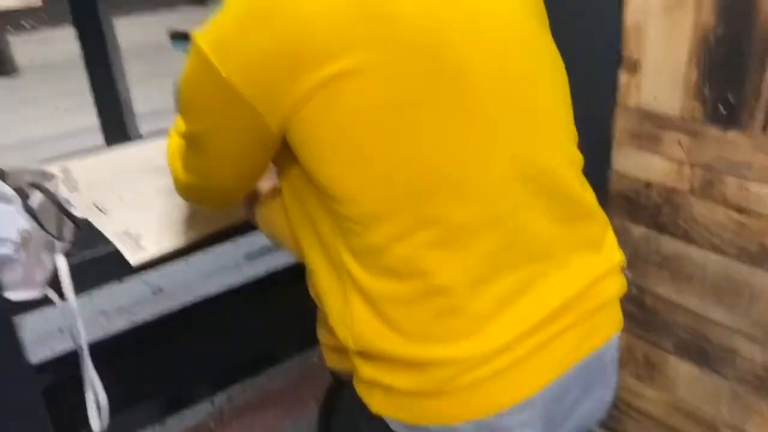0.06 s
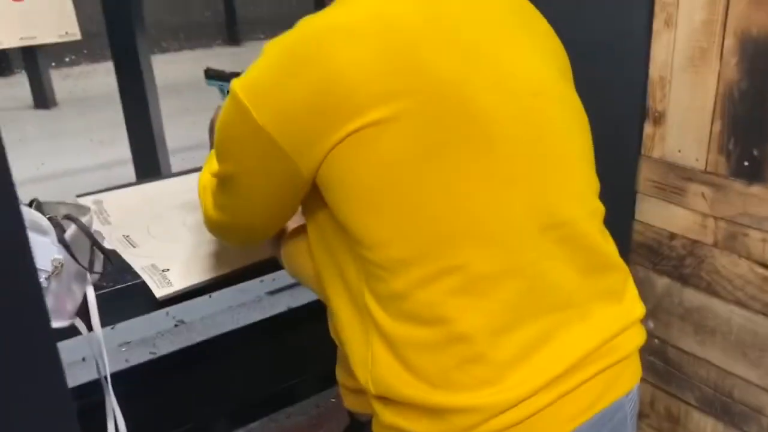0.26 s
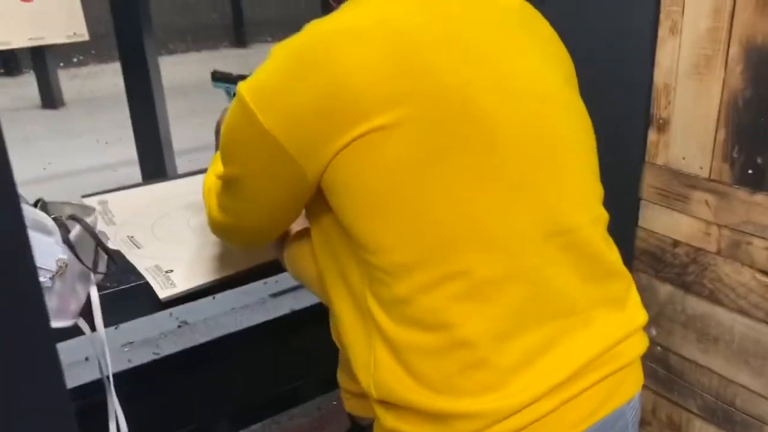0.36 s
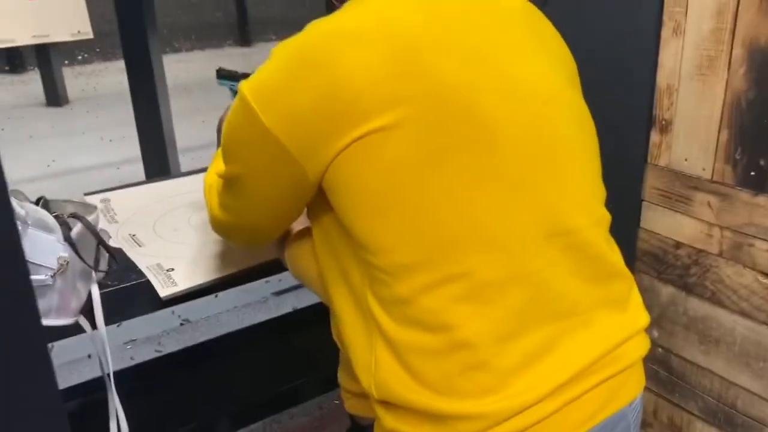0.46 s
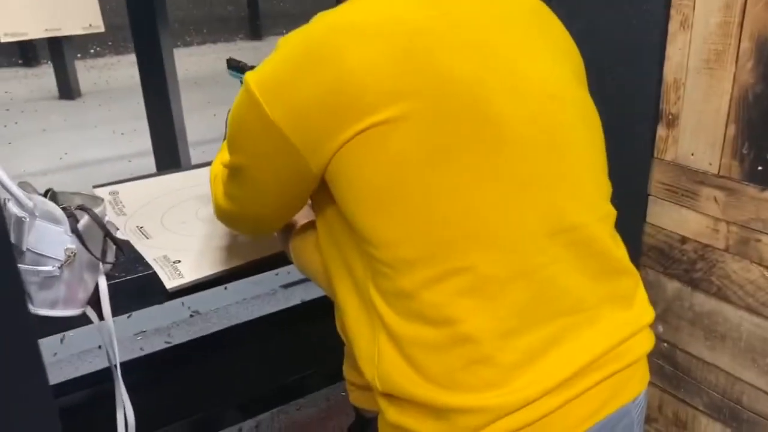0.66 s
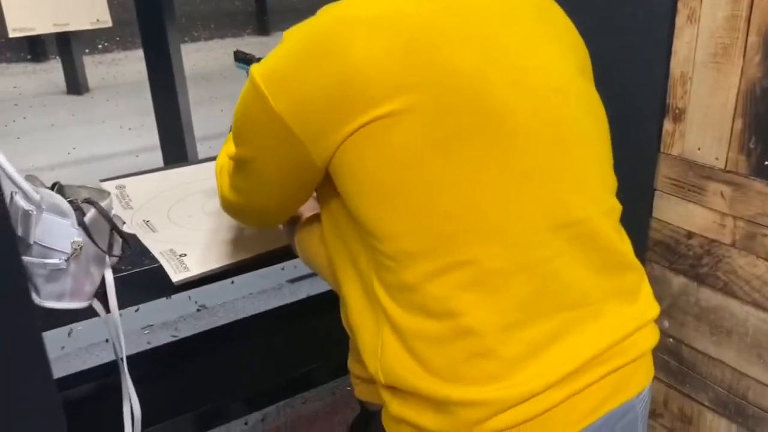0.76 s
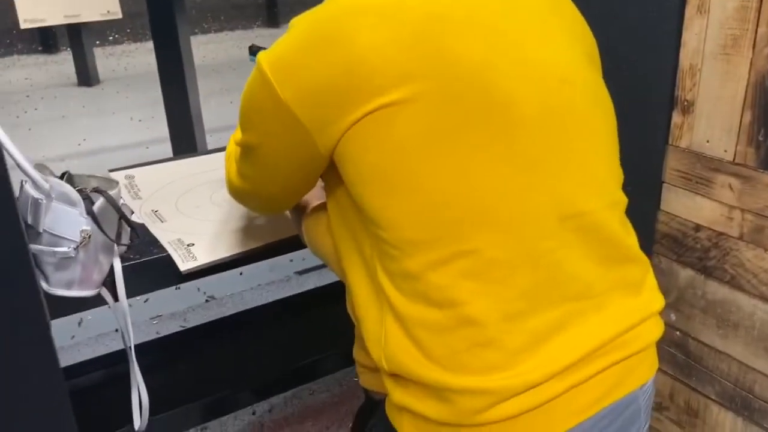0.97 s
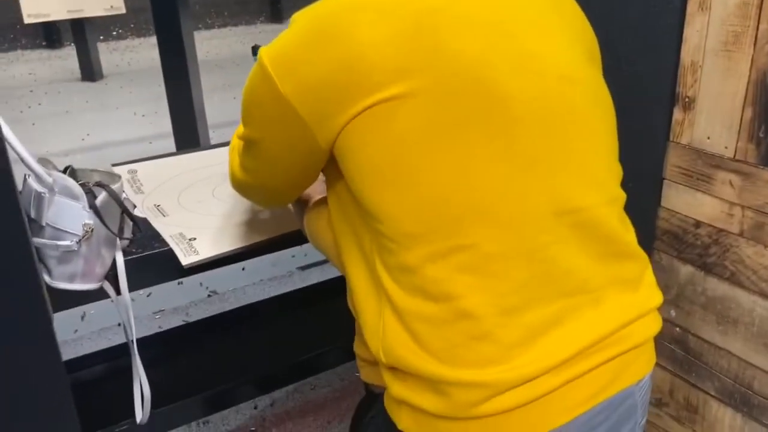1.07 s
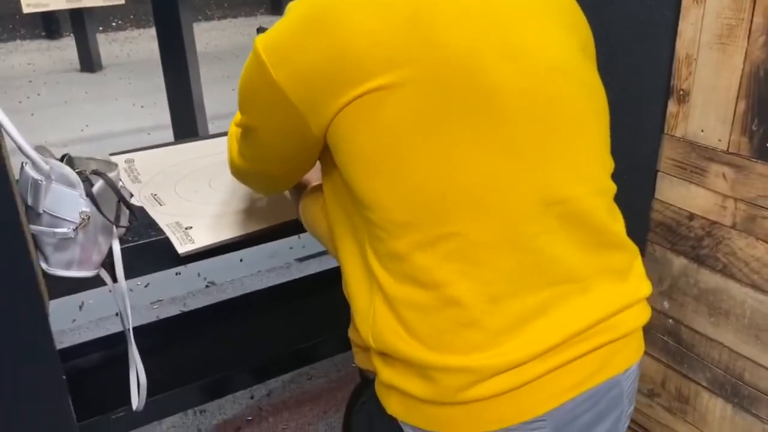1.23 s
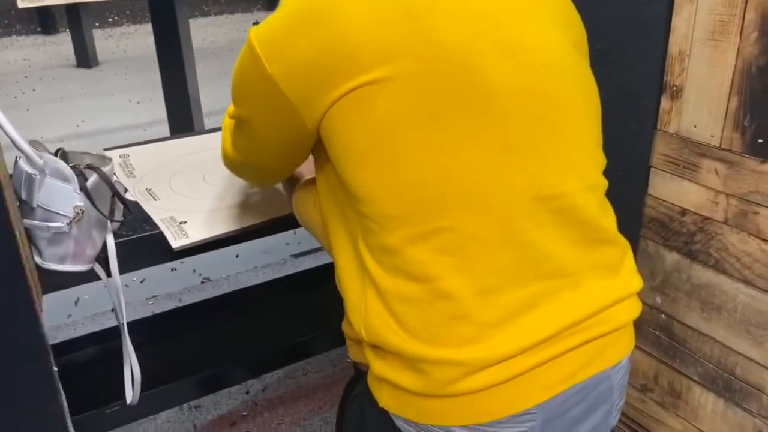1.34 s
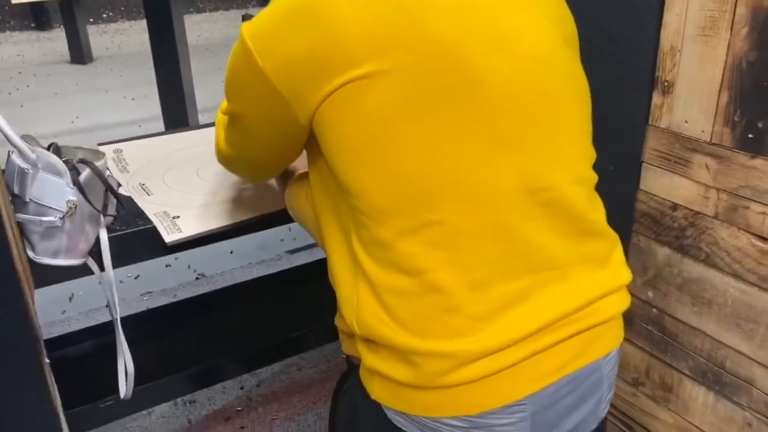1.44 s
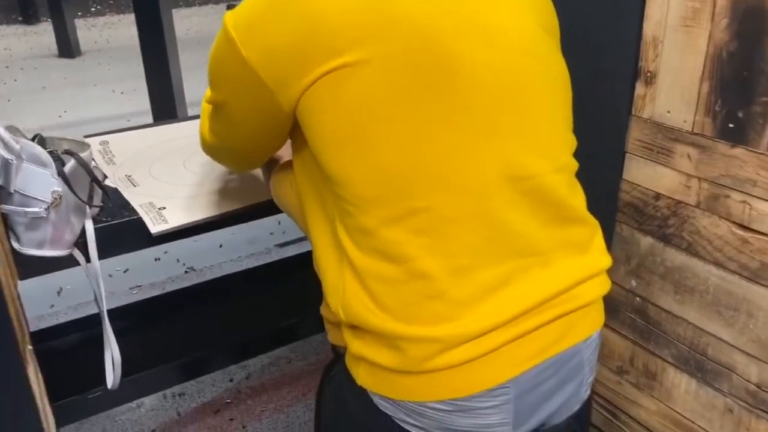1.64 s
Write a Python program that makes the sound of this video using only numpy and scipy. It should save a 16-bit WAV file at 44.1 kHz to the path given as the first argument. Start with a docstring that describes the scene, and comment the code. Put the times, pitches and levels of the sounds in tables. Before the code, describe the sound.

Pistol shots in an indoor range, heard from a wooden booth. Faint low ventilation hum first; at 0.2 s a shot from another lane roars through the hall. At 0.57 s a close blast, loudest and knocking hardest on the left, thumps and rings the panels, and the limiter ducks. More distant shots follow at 0.88 and 1.09 s with woody wall slaps, then a dense, booming tail fades.

```python
"""Four pistol shots in an indoor range, heard from inside a wooden shooting booth.
Three come from other lanes: shaped noise makes the dense roar of their reflections in the hall.
The second is also a close blast: a shock front, a low thump, ringing panels and scattered noise.
Delayed wall slaps ring the panels too, slow tones boom in the hall, and ventilation hums as steady noise.
The recorder's limiter ducks quickly after loud sound, then recovers slowly."""
import sys
import numpy as np
from scipy import signal
from scipy.fft import rfft, irfft, next_fast_len
from scipy.io import wavfile
from scipy.ndimage import uniform_filter1d

SR = 44100
rng = np.random.default_rng(int(sys.argv[2]) if len(sys.argv) > 2 else 0)


def put_to_file(sound):
    """Save the sound as 16-bit audio at rate SR, in the file named by the first command-line argument."""
    columns = np.atleast_2d(sound).T  # one column per channel
    safe = np.clip(columns, -1, 1)
    whole_steps = np.round(safe * 32767)
    wavfile.write(sys.argv[1], SR, whole_steps.astype(np.int16))


N = 74970  # length in samples

# Ringing wooden panels of the booth: pitch_hz [Hz], level_db [dB], t60_s [s to fall 60 dB]
PANELS = [(284, -6, 0.099), (379.4, -1.5, 0.091), (503, 1, 0.069), (741.4, 1.5, 0.058), (913, -3, 0.059)]


def amp(db):
    """Turn a level in dB into a gain."""
    return 10 ** (np.asarray(db) / 20)


def unit(x):
    """Scale x to an rms (average strength) of 1."""
    return x / np.sqrt(np.mean(x ** 2) + 1e-20)


def along(points, hz):
    """Read a curve of (Hz, value) points at the given frequencies, on a log frequency axis."""
    point_hz, values = np.transpose(points)
    return np.interp(np.log(hz + 1), np.log(point_hz + 1), values)


def filtered(x, response):
    """Scale each frequency in x by response(hz)."""
    size = next_fast_len(N + SR // 2)  # spare room for the filter's tail
    hz = np.fft.rfftfreq(size, 1 / SR)
    return irfft(rfft(x, size) * response(hz), size)[..., :N]


def since(start_s):
    """Seconds since start_s, zero before it."""
    return np.maximum(np.arange(N) / SR - start_s, 0)


def decay(t, t60_s):
    """Fading gain that falls 60 dB in t60_s seconds."""
    return np.exp(-np.log(1000) * t / t60_s)


def ring(modes, t):
    """Objects struck at t = 0 ring as a sum of fading sine tones."""
    return sum(amp(db) * np.sin(2 * np.pi * hz * t) * decay(t, t60_s) for hz, db, t60_s in modes)


def diffuse(colour, grain_db):
    """Dense reflections: stereo noise of uneven strength, rms 1; colour gives dB from Hz."""
    # Stereo spread: pitch_hz [Hz], side_over_mid_db [dB]
    width = [(60, -14), (130, -17), (200, -7.5), (300, -6.5), (640, 0), (950, 2), (1400, 0.5), (2100, -1.5),
             (4600, -2.5), (6900, -5), (9500, 9.5)]
    # Stereo balance: pitch_hz [Hz], left_over_right_db [dB]
    balance = [(60, 5.6), (150, 1.5), (330, 1), (600, 3), (1000, 3), (1800, 1), (4000, 2.5), (10000, 0)]
    unevenness = unit(uniform_filter1d(rng.standard_normal(N), size=50))
    arrivals = rng.standard_normal((2, N)) * amp(grain_db * unevenness)

    def mid_side_gain(hz):
        return amp(colour(hz)) * [np.ones(len(hz)), amp(along(width, hz))]

    def left_right_gain(hz):
        return amp(along(balance, hz) * np.array([[.5], [-.5]]))

    mid, side = filtered(arrivals, mid_side_gain)
    left_right = np.array([mid + side, mid - side])
    return unit(filtered(left_right, left_right_gain))


def blast():
    """The close shot: a shock front knocks the panels, pushes the air and scatters between the walls."""
    # Push of gas: pitch_hz [Hz], level_db [dB], t60_s [s to fall 60 dB]
    thump_modes = [(65, -7.5, .18), (118, 0, 0.099), (165, -2.5, .07)]
    # Scattered sound in the booth: pitch_hz [Hz], level_db [dB per Hz]
    booth_colour = [(53, -40), (90, -10), (331, -6), (395, -7.5), (453, -1), (818, -4.5), (958, -10),
                    (2570, -17.5), (7010, -26), (10000, -40), (13000, -80.5), (22000, -120)]
    start_s, blast_db = .575, 13.5
    # Part levels are relative to the whole blast
    shock_db, panels_db, thump_db = -11.5, -2.5, -7
    shock_s, shock_rise_s = 0.0004, .0005  # the front is blunted on its way round the shooter
    thump_rise_s, scatter_rise_s, scatter_t60_s = 0.0092, 0.012, .17
    left_over_right_db = 20

    t = since(start_s)
    u = t / shock_s
    shock = amp(shock_db) * np.minimum(t / shock_rise_s, 1) * (1 - u) * np.exp(-u)  # push, then suction
    knock = shock + amp(panels_db) * ring(PANELS, t)
    knock = knock * amp([[0], [-left_over_right_db]])
    scatter = diffuse(lambda hz: along(booth_colour, hz), grain_db=1.5)
    scatter = scatter * (1 - np.exp(-t / scatter_rise_s)) * decay(t, scatter_t60_s)
    thump = amp(thump_db) * ring(thump_modes, t) * np.minimum(t / thump_rise_s, 1)
    return amp(blast_db) * (knock + scatter + thump)


def hall(start_s, level_db, rise_s, hold_s, treble_db, ripple):
    """A shot fills the hall, holds while far walls answer, then dies at a speed set by pitch."""
    # Basic colour of the roar: pitch_hz [Hz], level_db [dB per Hz]
    hall_colour = [(53, -45.5), (90, -6.5), (107, -18.5), (156, -5), (198, -6.5), (419, -2.5), (453, -7),
                   (563, -4), (885, -3.5), (1600, -15.5), (1730, -14.5), (6360, -27), (7890, -28),
                   (8880, -43.5), (10000, -35.5), (13000, -85), (22000, -120)]
    # Broad and narrow resonances: pitch_hz [Hz], width_hz [Hz], lift_db [dB]
    hall_modes = [(287, 34, 0.5), (460, 62, 4), (526.4, 6, 10.5), (702, 9.9, 1.5), (778, 15, -0.5),
                  (829, 38, -4.5), (1285, 56, 1), (1804, 8.3, 3), (1984, 52, -6.5), (2240, 41, 4)]
    # Change while the far walls still feed the hall: pitch_hz [Hz], slope [dB per s]
    hold_slope = [(100, -18), (500, 17), (1000, -3.5), (2000, -15.5), (8000, -50.5)]
    # Fading after that: pitch_hz [Hz], t60_s [s to fall 60 dB]
    hall_t60 = [(100, 0.64), (250, 0.87), (500, 0.76), (1000, 0.65), (2000, 0.59), (4000, 0.56),
                (8000, 0.45)]
    ripple_spacing_hz, ripple_db = 21.95, 2  # the hall's finer peaks
    treble_hz = 1800  # middle of the treble shelf

    def colour(hz):
        lift = sum(db / (1 + (2 * (hz - centre) / width) ** 2) for centre, width, db in hall_modes)
        fine = ripple_db * np.interp(hz / ripple_spacing_hz, np.arange(len(ripple)), ripple)
        treble_share = hz ** 2 / (hz ** 2 + treble_hz ** 2)
        return along(hall_colour, hz) + lift + fine + treble_db * treble_share

    roar = diffuse(colour, grain_db=0.5)
    # Split into short time slices so that each pitch can fade at its own speed
    hz, t, slices = signal.stft(roar, SR, nperseg=512)
    held_db = along(hold_slope, hz)[:, None] * np.clip(t - start_s, 0, hold_s)
    dying = decay(np.maximum(t - start_s - hold_s, 0), along(hall_t60, hz)[:, None])
    roar = signal.istft(slices * amp(held_db) * dying, SR, nperseg=512)[1][:, :N]
    return amp(level_db) * roar * np.minimum(since(start_s) / rise_s, 1)


def boom(start_s, level_db):
    """The muzzle gas sets the hall's lowest modes swinging."""
    # Lowest hall modes: pitch_hz [Hz], level_db [dB before the doubling below], t60_s [s to fall 60 dB]
    boom_modes = [(54.3, -7.5, 0.54), (67.2, -6.5, 0.41)]
    rise_s = .033
    t = since(start_s)
    return 2 * amp(level_db) * ring(boom_modes, t) * np.minimum(t / rise_s, 1)


def slap(start_s, level_db, rise_s, t60_s):
    """A strong reflection, its treble lost, rings the panels mostly on the left."""
    # Dull noise of the reflection: pitch_hz [Hz], level_db [dB per Hz]
    slap_colour = [(60, -33), (200, -17.5), (400, -4), (900, -9.5), (1500, -17), (4000, -37.5),
                   (10000, -48)]
    noise_db, left_over_right_db = -2.5, 6
    t = since(start_s)
    smear = amp(noise_db) * diffuse(lambda hz: along(slap_colour, hz), grain_db=3.0)
    panels = ring(PANELS, t) * amp([[0], [-left_over_right_db]])
    return amp(level_db) * (panels + smear) * np.minimum(t / rise_s, 1) * decay(t, t60_s)


def ventilation():
    """Moving air hums as steady noise, strongest in the bass."""
    # Colour of the hum: pitch_hz [Hz], level_db [dB per Hz]
    vent_colour = [(15, -31), (25, -12), (88, -10), (148, -19.5), (200, -18.5), (271, -23), (365, -18),
                   (436, -27), (775, -30), (948, -30.5), (10000, -54.5), (13000, -89.5), (22000, -120)]
    return amp(-61) * diffuse(lambda hz: along(vent_colour, hz), grain_db=2.5)


def scene():
    """Add up the close blast, the shots in the hall, the wall slaps and the ventilation."""
    # Shots: start_s [s], hall_level_db [dB], rise_s [s], hold_s [s], treble_db [dB],
    # boom_level_db [dB before boom() doubles it]
    shots = [(0.2156, -13.5, 0.017, 0.096, 5, -24.5), (0.5685, -3, 0.035, 0.026, 3, -23.5),
             (0.878, -15, 0.017, 0.1, 5, -30), (1.093, -14.5, 0.0072, 0.074, 2.5, -25)]
    # Dull slaps off walls and partitions that shake the booth: start_s [s], level_db [dB], rise_s [s],
    # t60_s [s to fall 60 dB, on top of the panels' own fading]
    slaps = [(.268, -15, 0.0028, 0.089), (.287, -13.5, 0.0033, 0.059), (0.882, -9.5, 0.0022, .1),
             (.892, -8.5, 0.0013, 0.27), (.8995, -2, 0.0012, 0.077), (1.002, -10, .004, 0.05),
             (1.017, -14, 0.0011, .09), (1.158, -13, .002, 0.053)]
    out = blast()
    ripple = rng.standard_normal(size=2048)  # one hall, so every shot shares its fine peaks
    for start_s, level_db, rise_s, hold_s, treble_db, boom_db in shots:
        out = out + hall(start_s, level_db, rise_s, hold_s, treble_db, ripple)
        out = out + boom(start_s, boom_db)
    for row in slaps:
        out = out + slap(*row)
    return out + ventilation()


def record(dry):
    """A limiter ducks fast and recovers slowly; peaks round off and the top is cut."""
    # Microphone response: pitch_hz [Hz], gain_db [dB]
    mic_response = [(20, -20.5), (35, -6), (50, -0.5), (7800, 0), (9000, 0.5), (10400, -7)]
    limit_db, duck_s, recover_db_per_s = -11, 0.007, 56.5
    ceiling, top_hz = 0.84, 10400

    smooth = np.exp(-1 / (duck_s * SR))
    power = signal.lfilter([1 - smooth], [1, -smooth], np.mean(dry ** 2, axis=0))
    over_db = np.maximum(10 * np.log10(np.abs(power) + 1e-12) - limit_db, 0)
    # Hold the deepest cut so far, while it shrinks at the recovery speed
    recovery_db = recover_db_per_s * since(0)
    cut_db = np.maximum.accumulate(over_db + recovery_db) - recovery_db
    limited = dry * amp(-cut_db)
    rounded = limited / (1 + np.abs(limited / ceiling) ** 6) ** (1 / 6)
    return filtered(rounded, lambda hz: amp(along(mic_response, hz)) * (hz < top_hz))


dry = scene()
out = record(dry)
put_to_file(out)
```